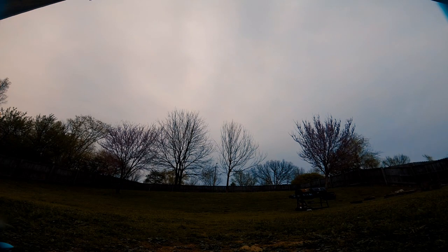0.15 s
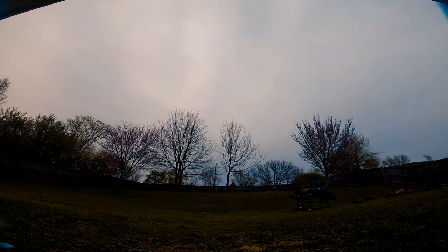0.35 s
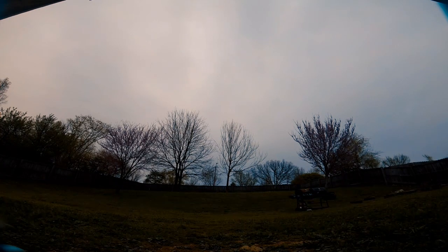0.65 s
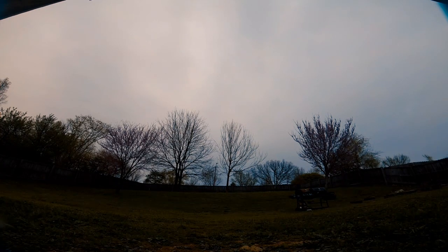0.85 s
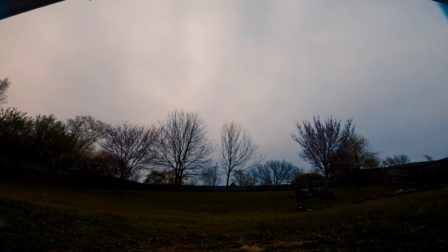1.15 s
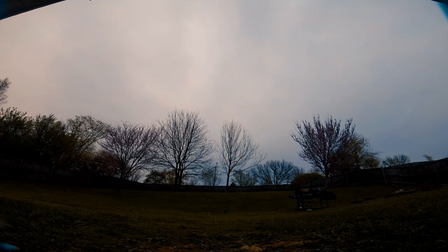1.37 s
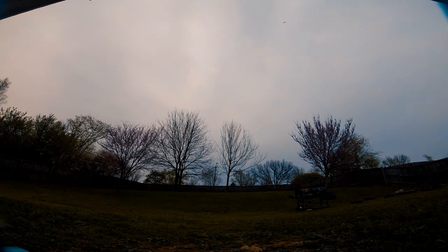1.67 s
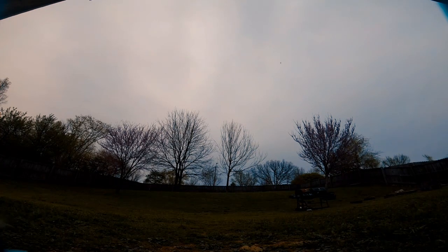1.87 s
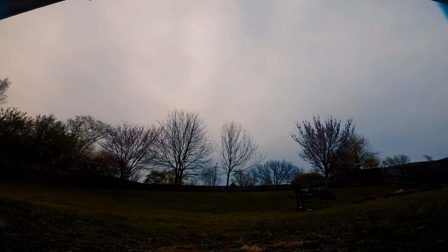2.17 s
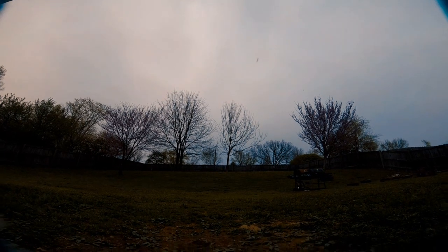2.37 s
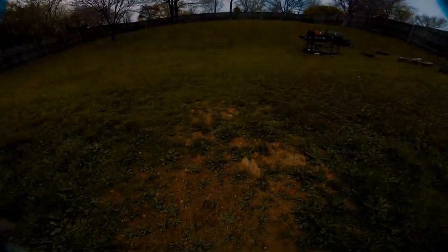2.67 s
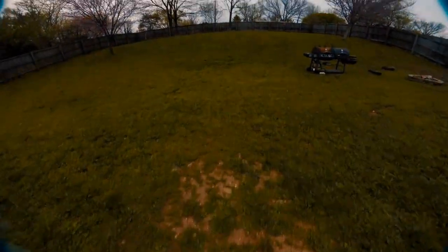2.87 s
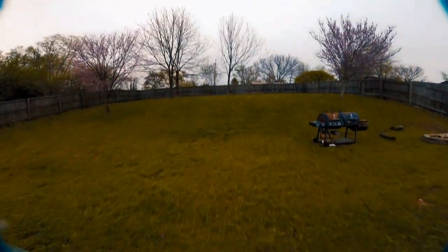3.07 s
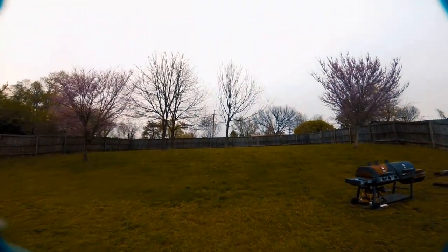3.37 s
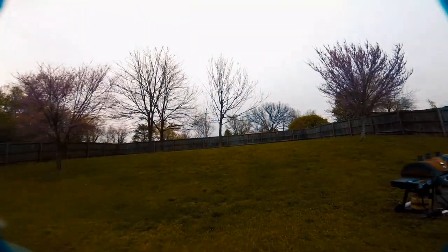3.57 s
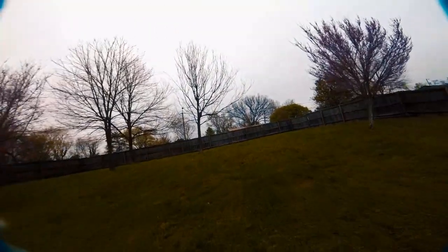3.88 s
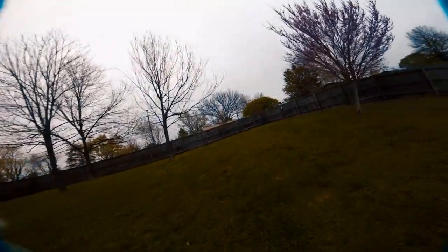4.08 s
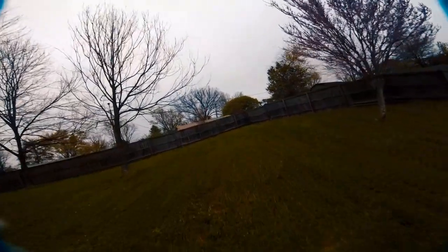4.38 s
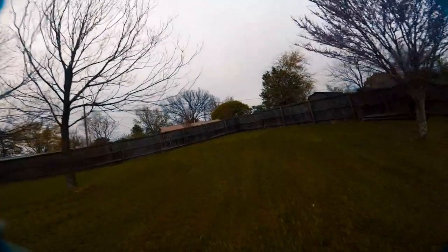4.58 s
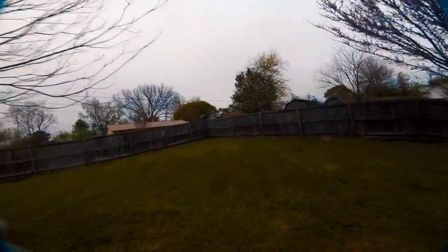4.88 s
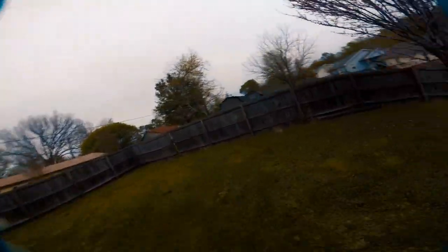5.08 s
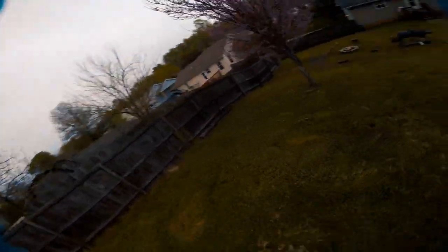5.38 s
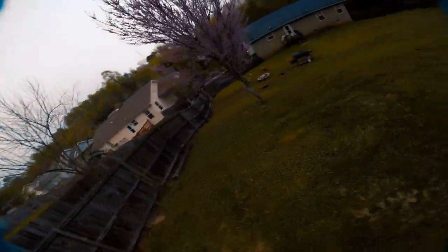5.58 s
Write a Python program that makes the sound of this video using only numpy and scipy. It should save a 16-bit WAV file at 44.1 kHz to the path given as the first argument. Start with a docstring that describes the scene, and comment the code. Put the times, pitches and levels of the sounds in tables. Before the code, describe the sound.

Heard from a microphone on a small racing drone, the motors click, spin up and tick over with a low rattling hum on a lawn. A sudden loud surge takes it into the air, where four propellers beat against each other in a swooping whine, with a thin motor whistle and gusts on the microphone. The swings ease and a whistle of wind grows near the end.

```python
"""A lawn in a quiet yard, with the microphone in the camera on board a small racing quadcopter.
The motors tick, start and idle while the frame rattles on the ground; then the craft lifts off.
At arm's length or less, four unbalanced rotors beat against each other as the throttle swings.
Their blades whine, the motor magnets whistle, and chopped air rushes over the microphone."""
import sys
import numpy as np
from scipy import signal
from scipy.fft import rfft, irfft
from scipy.io import wavfile
from scipy.ndimage import uniform_filter1d, minimum_filter1d

SR = 44100
rng = np.random.default_rng(int(sys.argv[2]) if len(sys.argv) > 2 else 0)


def wrap_up_sound(samples):
    """Save the sound to the file named by the first command line argument, as 16-bit audio."""
    columns = np.atleast_2d(samples).T
    # keep every value between -1 and 1, then stretch to whole-number steps
    tamed = np.clip(columns, -1, 1)
    steps = np.round(tamed * 32767).astype(np.int16)
    wavfile.write(sys.argv[1], SR, steps)


N = 253024
T = np.arange(N) / SR
START, LIFT, AIRBORNE = .4505, 2.274, 2.426  # [s]
HOVER_HZ = 220  # shaft turns a second

# a punch off the ground, then swings that settle toward a cruise (time [s], speed [turns/s])
THROTTLE = [(2.295, 60), (2.347, 211), (2.505, 346), (2.64, 211), (2.77, 155), (2.91, 263.5), (3.19, 119.5),
            (3.37, 216), (3.56, 243), (3.68, 320), (3.82, 166), (3.92, 149), (4.11, 226.5), (4.24, 247),
            (4.42, 193), (4.58, 231), (4.77, 248), (5.01, 221), (5.36, 240.4), (5.47, 195), (5.56, 226),
            (5.74, 202)]
# banking: the rotor nearest the microphone swings above and below the throttle
# (time [s], offset [share of speed])
BANKING = [(2.45, 0.061), (2.5, -.06), (2.56, -0.01), (2.98, 0.023), (3.11, -0.19), (3.21, 0.0096),
           (3.6, -0.03), (3.65, -0.08), (3.91, -0.029), (4.79, -.03), (5.08, -0.12), (5.2, 0.0079),
           (5.36, 0.031), (5.48, .32), (5.56, -.04), (5.66, .3)]
# steering: one rotor runs above the throttle, one below (time [s], offset [share of speed])
STEERING = [(2.3, .2), (2.5, 0.078), (3.4, .13), (4.95, .11), (5.15, .23), (5.74, 0.27)]
def rotor_speeds(lag_s=0.032):
    """Turns a second of the hardest-shaking, near, fast and slow rotor; inertia rounds off each change."""
    (throttle,), (bank,), (steer,) = curves(THROTTLE), curves(BANKING), curves(STEERING)
    return [uniform_filter1d(throttle * (1 + share), round(lag_s * SR))
            for share in (0, bank, steer, -steer)]


# the same four rotors, heard from the camera (idle speed [turns/s], shaking [dB], whine [dB])
ROTORS = [(85.77, 1.5, -23), (88.76, -5, -1.5), (118.5, -9.5, -14.5), (83.54, -9.5, -30)]
# the hum swells and sinks about the level that its speed gives (time [s], level [dB])
HUM_SWELL = [(2.3, -14.5), (2.54, -6.5), (2.59, -19), (2.68, 2), (2.73, -6.5), (2.8, -6), (2.84, 2),
             (2.96, -6), (3.0, 2.5), (3.07, -3.5), (3.11, -10.5), (3.36, 2.5), (3.5, -1.5), (3.58, -6),
             (3.77, 1), (3.87, -3.5), (4.07, 3), (4.22, 0), (4.46, -3), (4.56, 5.5), (4.66, -4.5),
             (4.83, -7), (4.87, 1.5), (4.98, 4.5), (5.1, -3), (5.74, -2.5)]
def rotor_hum(speed, shafts):
    """Each rotor's imbalance shakes the camera once a turn; their unequal speeds beat."""
    level = amp(-6 + 7.6 * np.log2(speed / HOVER_HZ) + curves(HUM_SWELL)[0])
    shake = sum(amp(db) * np.exp(1j * shaft) for shaft, (_, db, _) in zip(shafts, ROTORS))
    slow_rms = np.sqrt(uniform_filter1d(abs(shake) ** 2, size=3000) / 2)
    hum = shake.real / slow_rms * amp(2.12 * drift(22))  # the quick beats stay, and the level wavers
    overtones = sum(amp(db / 2 + 5.5 * drift(21)) * (np.sin(2 * shaft) + np.sin(3 * shaft))
                    for shaft, (_, db, _) in zip(shafts, ROTORS))
    return level * hum + amp(-26.5) * level ** .5 * unit(overtones)


# partials of one four-bladed rotor (multiple of shaft speed, relative level [dB])
BLADE_PARTIALS = [(4, 13), (5, -21), (6, -30), (7, -29), (8, -1.5), (10, -32), (12, -10), (16, -15),
                  (20, -17.5), (24, -22.5), (28, -26.5)]
# the path through the frame to the microphone (frequency [Hz], gain [dB])
FRAME_PATH = [(400, -10), (800, -3), (1150, 0), (1290, 4.5), (1410, 2.5), (1700, -1), (2300, 2),
              (3200, 4.5), (4200, 3), (9000, -2)]
def blade_whine(speed, shafts):
    """The blades sing at multiples of shaft speed; flutter, growing late on, smears the high partials."""
    whine = 0
    for shaft, (_, _, rotor_db) in zip(shafts, ROTORS):
        flutter = (.06 + .035 * ramp(3.7, 1)) * drift(110)
        whine += sum(amp(rotor_db + db + 2.4 * drift(43)) * np.sin(multiple * (shaft + flutter))
                     for multiple, db in BLADE_PARTIALS)
    level = flight_gain(speed, db=-29.5, octave_db=2.5, push_db=0.2, ground_db=9, ground_s=0.4)
    return level * downwash_bites() ** 0.67 * unit(colour(whine, FRAME_PATH))


# the magnets' whistle as the camera case passes it (frequency [Hz], gain [dB])
MAGNET_PATH = [(3000, -3), (5000, 0), (6800, 0), (7600, -5), (8200, -16), (10000, -40)]
def magnet_whistle(speed, shafts):
    """The motors whistle at the rate of their drive steps, and shriek under full current."""
    whistle, shriek = 0, 0
    for shaft, (_, _, rotor_db) in zip(shafts, ROTORS):
        steps = 42 * shaft  # six drive steps for each of seven magnet pairs
        whistle += amp(rotor_db / 3 + 4.5 * drift(70)) * np.sin(steps + drift(100))
        shriek += amp(rotor_db / 2) * (np.sin(steps) + .6 * np.sin(steps / 2))  # adds the octave below
    level = flight_gain(speed, db=-46.5, octave_db=1, push_db=0, ground_db=7, ground_s=.6)
    return colour(level * whistle + amp(surge_db() + 3) * shriek, MAGNET_PATH)


# gusts right on the microphone (frequency [Hz], relative density [dB])
GUST_SPECTRUM = [(15, -12), (35, -4.5), (100, -0.5), (250, -1.5), (400, -15.5), (1500, -65)]
# rotor wash close by (frequency [Hz], relative density [dB])
WASH_SPECTRUM = [(100, -10), (300, -33.5), (500, 19.5), (900, 4.5), (1150, 7), (1380, 9), (1650, 3),
                 (2500, 8.5), (3200, -16.5), (4500, -37), (9000, -55.5)]
# hiss of the blade tips (frequency [Hz], relative density [dB])
TIP_SPECTRUM = [(1000, -16), (2800, 7.5), (3600, -5), (5000, -2), (6400, 4.5), (9500, -1.5), (11000, -12),
                (12500, -21), (15000, -26)]
# wind whistling over the frame as the craft gathers speed (time [s], level [dB])
SLIPSTREAM = [(3.9, -52), (4.9, -45.5), (5.15, -42), (5.5, -33), (5.6, -33), (5.74, -31.5)]
def rushing_air(speed, shafts):
    """Gusts on the microphone, and turbulence chopped by the passing blades."""
    slipstream = amp(curves(SLIPSTREAM)[0])
    chop = amp(0.43 * np.cos(shafts[0]) + 1.4 * np.cos(4 * shafts[1]) + 1.12 * drift(25))
    buzz = amp(-10) * sum(rasp(shaft, size=160) for shaft in shafts)
    whistle = noise([(3000, -14), (5500, -15), (6600, 4.5), (7700, .5), (9000, -8), (12000, -34)], chop)
    hiss = noise(TIP_SPECTRUM, chop, buzz) / (1 + amp(22) * slipstream)  # gives way to the whistle
    gust_gain = flight_gain(speed, db=-30, octave_db=9, push_db=0.34, ground_db=30, ground_s=0.16)
    wash_gain = flight_gain(speed, db=-30, octave_db=-3.5, push_db=0, ground_db=19, ground_s=0.11)
    tip_gain = flight_gain(speed, db=-37.5, octave_db=11, push_db=0.59, ground_db=3.5, ground_s=0.62)
    gusts = (gust_gain + amp(10) * slipstream) * noise(GUST_SPECTRUM)
    wash = (wash_gain * downwash_bites() + amp(-10) * slipstream) * noise(WASH_SPECTRUM, chop, buzz)
    tips = tip_gain * downwash_bites() ** 0.37 * hiss
    return gusts + wash + tips + slipstream * whistle


# rough air just beside the microphone (time [s], half-width [s], boost [dB])
BITES = [(2.63, 0.052, 5.5), (3.313, 0.052, 6.5), (3.62, 0.074, 4.5), (4.013, 0.035, 4.5),
         (4.44, 0.029, 0.5), (5.246, 0.11, 3)]
def downwash_bites():
    """Gain that swells each time the rotors bite into their own downwash."""
    return amp(sum(db * np.exp(-((T - time) / width) ** 2) for time, width, db in BITES))


# the idle, with the microphone down at grass height (time [s], relative level [dB])
IDLE_LEVEL = [(.46, -9.5), (.6, -7), (1, -9.5), (1.17, -10), (1.4, -9), (1.8, -9.5), (2.26, -8.5)]
# low tones of the idling motors (frequency [Hz], relative level [dB])
IDLE_HUM = [(91.5, -51.5), (172.3, -13.5), (236.9, -19), (269.2, -27), (355.3, -25.5), (409.1, -29.5),
            (592.2, -39.5), (995.9, -40)]
# their high tones (frequency [Hz], relative level [dB])
IDLE_WHINE = [(1868, -42.5), (1902, -43.5), (2171, -44), (3625, -64), (3762, -55), (4546, -62), (4700, -63),
              (5170, -67), (6340, -63), (7280, -65.5)]
# the frame rattling on the ground under the camera (frequency [Hz], relative density [dB])
RATTLE_SPECTRUM = [(40, -37), (100, -30.5), (160, 6.5), (250, 6.5), (320, -4), (470, -6), (580, 2),
                   (750, -4.5), (1100, -23), (1350, -18.5), (2000, -30), (2400, -26), (4000, -42.5),
                   (5700, -51), (7600, -44), (9500, -62), (12000, -110)]
def ground_idle(start_share=.62, settle_s=.085):
    """The rotors spin up and tick over; every turn knocks the frame against the ground."""
    spin = 1 - (1 - start_share) * np.exp(-np.maximum(T - START, 0) / settle_s)
    shafts = [angle(hz * spin * (1 + .002 * drift(15))) for hz, _, _ in ROTORS]
    hum = sum(amp(db) * np.sin(angle(hz * spin ** .3 * (1 + 0.01194 * drift(10.74))))
              for hz, db in IDLE_HUM)
    whine = sum(amp(db + 3.5 * drift(70)) * np.sin(angle(hz * spin * (1 + .0018 * drift(40))))
                for hz, db in IDLE_WHINE)
    knocks = sum(np.exp(.8 * np.cos(shaft + .9 * drift(40))) * amp(1.5 * drift(60)) for shaft in shafts)
    bearings = amp(-8) * sum(rasp(shaft, size=400) for shaft in shafts)
    rattle = amp(-14.5) * noise(RATTLE_SPECTRUM, knocks, bearings)
    downwash = amp(-34.5) * ramp(1.25, 0.5) * noise(GUST_SPECTRUM)
    ring_gain = amp(-25) * np.exp(-((T - .495) / 0.042) ** 2)  # the rising whine meets a frame resonance
    ring = ring_gain * np.sin(angle(1300 + 15 * drift(60)))
    on_ground = ramp(START, .006) * (1 - ramp(LIFT + .03, AIRBORNE - LIFT))
    level = amp(curves(IDLE_LEVEL)[0] + 12) * on_ground
    return level * (amp(-0.5) * hum + whine + rattle + downwash + ring)


# full current at start and lift-off (time [s], hold [s], first level [dB], last level [dB], fade [dB/s])
SURGES = [(.463, 0.019, -32.5, -30.5, 359), (2.267, 0.071, -28.5, -18, 612)]
def surge_db(rise_db_per_s=2993):
    """Relative level of the current bursts: each rises quickly, grows while held, then fades."""
    bursts = []
    for time, hold, first_db, last_db, fade in SURGES:
        held_db = np.interp(T, [time, time + hold], [first_db, last_db])
        before, after = np.maximum(time - T, 0), np.maximum(T - time - hold, 0)
        bursts.append(held_db - rise_db_per_s * before - fade * after)
    return np.max(bursts, axis=0)


# the motors catching, close to the microphone (time [s], relative peak [dB], 60 dB decay [s])
TICKS = [(.409, -24, 0.018), (0.443, -16, 0.019), (0.45, -12.5, 0.011), (0.456, -13.5, 0.0051),
         (0.4726, -14, 0.0094)]
# the camera case around the microphone (frequency [Hz], gain [dB])
CASE_PATH = [(300, -4), (1500, -7), (3500, 4.5), (5000, -2.5), (6500, -0.5), (8000, 3), (9500, -15.5),
             (13000, -54)]
def motor_drive(knock_hz=726, knock_t60=0.094):
    """The motors tick as they catch and scratch when pushed hard; the first tick rings the frame."""
    ticks = sum(amp(db - 60 * np.maximum(T - time, 0) / t60) * (T >= time) for time, db, t60 in TICKS)
    scratch = amp(surge_db() + 2.53 * drift(290))
    envelope = amp(-4.5) * ticks + amp(2.5) * scratch
    age = np.maximum(T - TICKS[0][0], 0)
    knock = amp(-35.5 - 60 * age / knock_t60) * np.sin(2 * np.pi * knock_hz * age)
    return colour(envelope * rng.standard_normal(N), CASE_PATH) + knock


# the yard all around (frequency [Hz], relative density [dB])
YARD_SPECTRUM = [(100, -52.5), (150, 8.5), (190, 1), (480, -13.5), (2900, -26.5), (4800, -36.5),
                 (9000, -25), (15000, -56.5)]
def yard():
    """A faint, steady low murmur with a little hiss, far below the craft."""
    return amp(-50) * noise(YARD_SPECTRUM)


def flight_gain(speed, db, octave_db, push_db, ground_db, ground_s):
    """Gain: db at hover, plus dB per octave of speed, per octave a second of push, and at lift-off."""
    octaves = np.log2(speed / HOVER_HZ)
    push = np.clip(uniform_filter1d(np.gradient(octaves) * SR, size=2000), -3, 3)
    near_ground = np.exp(-(np.maximum(T - LIFT, 0) / ground_s) ** 2)
    return amp(db + octave_db * octaves + push_db * push + ground_db * near_ground)


def amp(db):
    """Decibels to gain."""
    return 10 ** (np.asarray(db) / 20)


def unit(x):
    """Scales to an rms of 1."""
    return x / np.sqrt(np.mean(x ** 2) + 1e-20)


def curves(rows):
    """Each column of a table of times, drawn out to one value a sample."""
    times, *columns = np.transpose(rows)
    return [np.interp(T, times, column) for column in columns]


def colour(x, spectrum):
    """Filters x by rows of (frequency [Hz], gain [dB]); the ends are mirrored."""
    hz, db = np.transpose(spectrum)
    gain = amp(np.interp(np.log(np.fft.rfftfreq(2 * N, 1 / SR) + 1), np.log(hz), db))
    return irfft(rfft(np.r_[x, x[::-1]]) * gain)[:N]


def noise(spectrum, gate=1, buzz=0):
    """Gated noise of rms 1 with a given spectrum; buzz is a part that repeats."""
    return unit(colour(gate * (rng.standard_normal(N) + buzz), spectrum))


def drift(hz):
    """Smooth random wander of rms 1, up to about hz changes a second."""
    return unit(irfft(rfft(rng.standard_normal(N)) / (1 + (np.fft.rfftfreq(N, 1 / SR) / hz) ** 4), N))


def angle(speed):
    """Angle in radians from turns a second, from a random start."""
    return 2 * np.pi * (np.cumsum(speed) / SR + rng.random())


def ramp(start, length):
    """Rises from 0 to 1."""
    return np.clip((T - start) / length, 0, 1)


def rasp(shaft, size):
    """A rough pattern that comes round again with every turn of a shaft."""
    return np.interp(shaft, np.arange(size) * 2 * np.pi / size, rng.standard_normal(size),
                     period=2 * np.pi)


def scene():
    """Quiet yard, idle, then flight, all at the one on-board microphone."""
    speeds = rotor_speeds()
    shafts = [angle(speed * (1 + .012 * drift(30))) for speed in speeds]  # the flight controller's nudges
    flight = sum(source(speeds[0], shafts)
                 for source in (rotor_hum, blade_whine, magnet_whistle, rushing_air))
    return (flight * ramp(LIFT, 0.081) + ground_idle() + motor_drive() + yard())[None]


def record(dry):
    """The camera's limiter holds the peaks down; then its band limit cuts the top treble."""
    ceiling_db, edge_hz = -.7, 15200
    gain = np.minimum(1, amp(ceiling_db) / (abs(dry[0]) + 1e-9))
    gain = uniform_filter1d(minimum_filter1d(gain, size=700), size=700)
    lowpass = signal.firwin(511, edge_hz, window=("kaiser", 9), fs=SR)
    return signal.oaconvolve(dry * gain, lowpass[None], "same")


dry = scene()
out = record(dry)
wrap_up_sound(out)
```